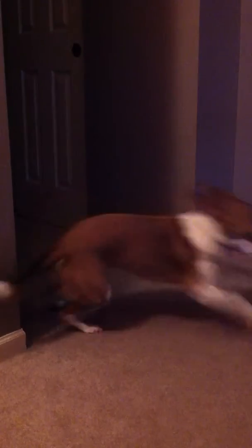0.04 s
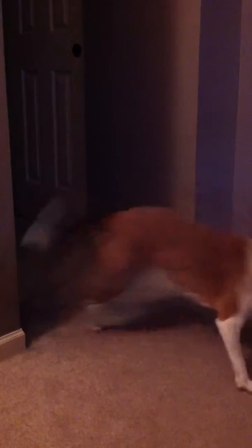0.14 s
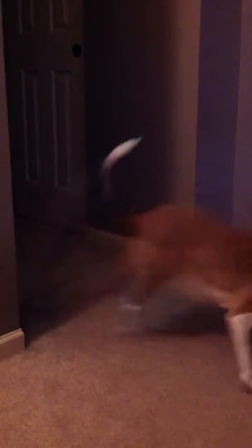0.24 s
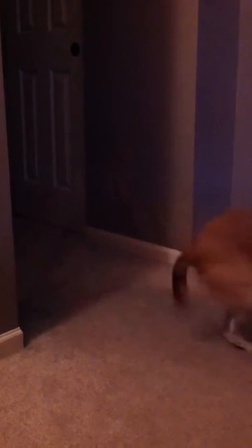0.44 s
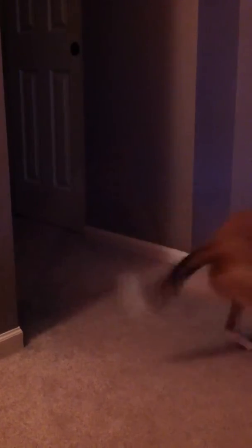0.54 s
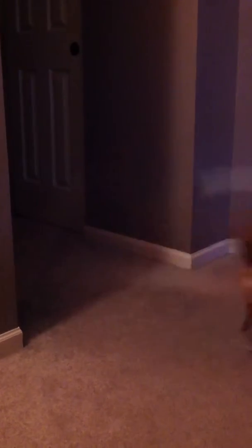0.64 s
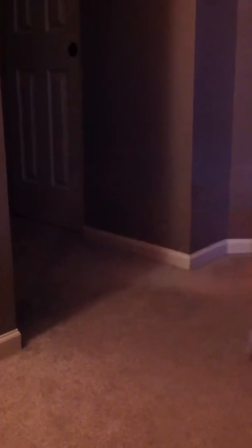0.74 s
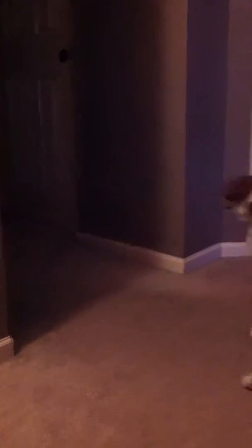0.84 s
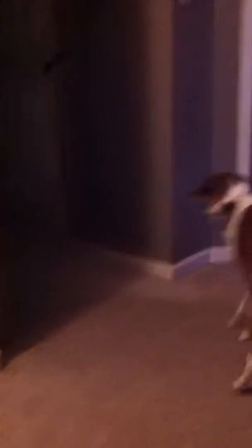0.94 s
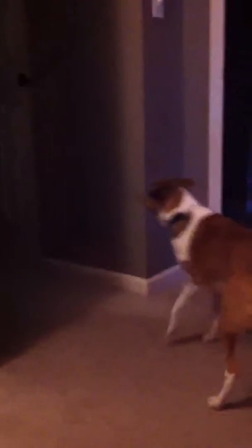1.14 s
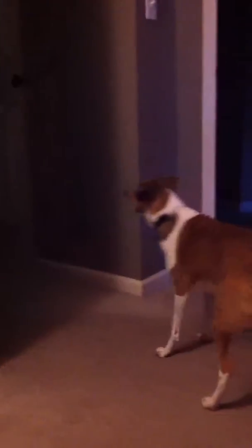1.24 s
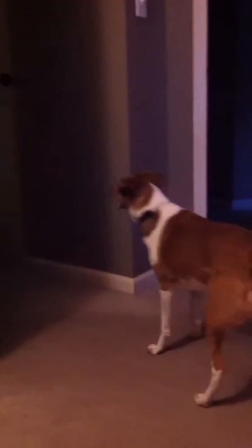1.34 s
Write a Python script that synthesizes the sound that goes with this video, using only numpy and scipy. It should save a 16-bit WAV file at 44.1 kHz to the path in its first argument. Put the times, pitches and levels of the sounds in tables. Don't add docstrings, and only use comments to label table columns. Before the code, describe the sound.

A dog barks twice, sharp and loud, in a hallway while collar tags jingle and paws thud.

```python
import sys
import numpy as np
from scipy import signal
from scipy.fft import rfft, irfft, next_fast_len
from scipy.io import wavfile
from scipy.ndimage import uniform_filter1d, minimum_filter1d, map_coordinates

SR = 44100
rng = np.random.default_rng(int(sys.argv[2]) if len(sys.argv) > 2 else 0)


def bounce(signal):
    frames = np.transpose(np.atleast_2d(signal))
    limited = np.clip(frames, -1, 1)
    pcm = np.round(limited * 32767).astype(np.int16)
    wavfile.write(sys.argv[1], SR, pcm)


def convert_level_to_amplitude(level_db):
    exponent = np.asarray(level_db, float) / 20
    return 10 ** exponent


N = 61739


def unit(x):
    return x / np.sqrt(np.mean(x ** 2) + 1e-20)


def along(points, hz):
    f, v = np.transpose(points)
    return np.interp(np.log(hz + 1), np.log(f + 1), v)


def wobble(rate):
    return map_coordinates(rng.standard_normal(4000), [np.arange(N) * rate / SR], mode="wrap")


def filtered(x, response):
    m = next_fast_len(N + SR // 2)
    return irfft(rfft(x, m) * response(np.fft.rfftfreq(m, 1 / SR)), m)[:N]


def coloured_noise(spectrum):
    return unit(filtered(rng.standard_normal(N), lambda f: convert_level_to_amplitude(along(spectrum, f))))


def resonances(f, peaks):
    total = 0
    for k, (centre, width, db) in enumerate(peaks):
        total = total + (-1) ** k * convert_level_to_amplitude(db) * 1j * f * width / (centre * centre - f * f + 1j * f * width)
    return total


def ring(modes, t, attack_s):
    luck = rng.standard_normal((len(modes), 2))
    total = 0
    for (hz, db, t60), (louder, phase) in zip(modes, luck):
        total = total + convert_level_to_amplitude(db + 2.6 * louder - 60 * t / t60) * np.sin(2 * np.pi * hz * t + phase)
    return total * (1 - np.exp(-t / attack_s))


# f/Hz, level/dB per Hz
AIR_SPECTRUM = [(25, -30), (90, -11), (140, 4), (300, -9), (900, 2), (2000, -4), (8000, -19), (13000, -27)]


def still_air():
    level_db = -68 + 3.0 * wobble(2.4)
    return convert_level_to_amplitude(level_db) * coloured_noise(AIR_SPECTRUM)


# f/Hz, t60/s
HALL_DECAY = [(150, 0.6), (400, 0.12), (600, 0.34), (1200, 0.4), (2000, 0.31), (3500, .36), (8000, 0.33),
              (12000, 0.69)]
STANDING_HZ = [535, 587, 637, 830, 897, 1192, 1224, 1265, 1295, 1362, 1723, 1872, 1947, 2536, 3117]
STANDING_DB = [7.5, 6, 5, 4, 9.5, 2, 3, -5, 2, 5.5, 6, 7.5, 3, -0.5, 7.5]
STANDING_T60_S = [.28, .27, .36, .25, .3, .44, .56, .44, .33, .35, .36, .31, .33, .37, .38]


def hall(x):
    gap_s, build_s, early_s, early_db = .005, .022, .025, -13
    hz, t, z = signal.stft(rng.standard_normal(SR), SR, nperseg=256)
    decay = convert_level_to_amplitude(-60 * t / along(HALL_DECAY, hz)[:, None])
    tail = signal.istft(z * decay, SR, nperseg=256)[1]
    u = np.arange(len(tail)) / SR
    tail = tail * (1 - np.exp(-u / build_s))
    tail = tail / np.linalg.norm(tail)
    when, size = rng.random((2, 7))
    tail[(when * early_s * SR).astype(int)] += convert_level_to_amplitude(early_db) * (2 * size - 1)
    for hz, db, t60 in zip(STANDING_HZ, STANDING_DB, STANDING_T60_S):
        per_sample = 2 * np.log(1000) / (t60 * SR)
        tail += convert_level_to_amplitude(db - 60 * u / t60) * per_sample * np.sin(2 * np.pi * hz * u)
    return signal.fftconvolve(np.pad(x, (round(gap_s * SR), 0)), tail)[:N]


# t/s, thud level/dB, deep push level/dB, scuff level/dB, scuff length/s
PAWS = [(-.01, -46, -87, -65, 0.19), (0.203, -46, -49, -100, .05), (0.24, -44, -45, -86, .05),
        (0.337, -48.5, -59, -84, .05), (0.425, -61.5, -70, -78, 0.039), (.52, -73.5, -66, -72, 0.058),
        (0.627, -70.5, -78, -74.5, 0.053), (0.702, -48, -72, -71.5, .05), (0.731, -63, -55, -60, 0.048),
        (0.785, -50.5, -65, -71, 0.028), (0.855, -50.5, -71, -73.5, 0.059), (0.929, -69.5, -73, -61, 0.085),
        (1.094, -73.5, -70, -65.5, 0.065), (1.267, -82, -69.5, -64, 0.1), (1.323, -73, -73.5, -95, 0.04)]
# f/Hz, width/Hz, level/dB
BOARDS = [(151, 17, -1), (230, 36, -4.5), (300, 66, -2), (345, 29, 1), (478, 64, -13), (560, 42, 2),
          (655, 200, -5), (880, 30, -17.5), (1150, 29, -21.5)]
# f/Hz, level/dB per Hz
CARPET = [(150, -28), (700, 5.5), (1600, 7), (4000, -12), (10000, -11.5), (14000, -34)]
# f/Hz, level/dB, t60/s
LANDING = [(138, 9.5, 0.26), (323.4, -1, .35), (500, -4, 0.44), (537, -0.5, .28), (670, -7.5, .5),
           (745, -20.5, 0.32), (910, -25.5, .8), (1147, -17, 1), (1620, -22.5, 1.4)]


def paws():
    thud_t60_s, push_s, push_hz = 0.31, .007, 45
    t = np.arange(N) / SR
    thud, push, brush = np.zeros((3, N))
    for s, thud_db, push_db, scuff_db, length in PAWS:
        u = np.maximum(t - s, 0)
        thud += convert_level_to_amplitude(thud_db - 60 * u / thud_t60_s) * (1 - np.exp(-u / 0.0021))
        push += convert_level_to_amplitude(push_db) * u / push_s * np.exp(1 - u / push_s) * np.cos(2 * np.pi * push_hz * u)
        brush += convert_level_to_amplitude(scuff_db) * u / length * 4 * np.exp(1 - u / length * 4)
    fibres = coloured_noise(CARPET) * convert_level_to_amplitude(1.4 * wobble(40))
    boards = filtered(thud * rng.standard_normal(N), lambda f: resonances(f, BOARDS))
    leap = convert_level_to_amplitude(-46) * ring(LANDING, t, 0.0017)
    return convert_level_to_amplitude(24) * boards + push + brush * fibres + leap


# t/s, peak level/dB, which tag (0 first, 1 second)
JINGLES = [(.001, -68, 0.7), (0.039, -58, 0), (0.13, -68, 1), (0.141, -56, 1), (0.194, -64, 0.03),
           (.262, -46.5, 0.8), (0.373, -63, 0.91), (0.397, -50, 0.3), (0.542, -58.5, 0.94),
           (.646, -58.5, 1), (0.66, -47.5, 0.03), (0.799, -38, 0.06), (0.871, -50, 0.84),
           (0.975, -57, 0.58), (1.021, -59, .4), (1.105, -68, 0.69), (1.175, -68, 0.5),
           (1.286, -57.5, 0.41)]
# f/Hz, level/dB, t60/s
FIRST_TAG = [(3340, -18, .1), (5680, -12, .08), (6928, -12, .12), (8810, 0, .08), (8930, -4, .1),
             (12600, -13, .15)]
# f/Hz, level/dB, t60/s
SECOND_TAG = [(5663, -14, .1), (9302, -2, .12), (10880, -7, .12), (10990, -7, .15), (12620, -9, .16),
              (13730, -12, .08)]
# f/Hz, level/dB per Hz
SIZZLE = [(2500, -33.5), (5500, -0.5), (9000, 1), (11000, -4), (12600, -10), (14000, -15.5), (16000, -45)]


def tags():
    tick_db, tick_t60_s, rattle_db = -8, 0.072, 1.5
    t = np.arange(SR // 4) / SR
    ringing, scrape = np.zeros((2, N + SR))
    for s, db, which in JINGLES:
        which = np.clip(which, 0, 1)
        start = round(s * SR)
        first, second = ring(FIRST_TAG, t, 0.003), ring(SECOND_TAG, t, 0.00071)
        ringing[start:][:len(t)] += convert_level_to_amplitude(db) * ((1 - which) * first + which * second)
        scrape[start:][:len(t)] += convert_level_to_amplitude(db + tick_db - 60 * t / tick_t60_s) * (1 - np.exp(-t / 0.0017))
    return (ringing[:N] + scrape[:N] * coloured_noise(SIZZLE)) * convert_level_to_amplitude(rattle_db * wobble(150))


# t/s, depth/dB, half length/s
CATCHES = [
    (.263, 3, .003),
    (.2775, 7, .003),
    (.291, 12, .0025),
    (.317, 3, .004),
    (.372, 5, .005),
    (.775, 7, .002),
    (.802, 6, .005),
    (.837, 5, .005),
    (.862, 4, .004),
    (.897, 4, .005),
]


def catches():
    t = np.arange(N) / SR
    return convert_level_to_amplitude(-sum(depth * np.exp(-((t - at) / half) ** 2) for at, depth, half in CATCHES))


def tract(f, peaks):
    low_cut_hz, top_hz = 330, 10500
    low = 1j * f / low_cut_hz
    return resonances(f, peaks) * (low / (1 + low)) ** 2 / (1 + (f / top_hz) ** 10)


# t/s, pitch f/Hz, effort level/dB, roughness 0-1, fundamental level/dB, mouth opening 0-1
BARKS = [
    [(.205, 400.2, -54, 0.28, -8.5, 0.1), (.226, 411.5, -21, 0.22, -5, 0.43),
     (.236, 454, -21.5, 0.3, 14.5, 0.95), (.254, 540.6, -13.5, 0.02, -4.5, 0.32),
     (.27, 617.7, -10, 0.17, -3.5, 1), (.306, 651.2, -13, 0.02, -7.5, 0.49),
     (.328, 625.5, -18, 0.02, -3, 0.23), (.343, 520.4, -24.5, 0.15, 7.5, 0.3),
     (.39, 300, -41, 0.42, 8, .05)],
    [(.7, 300, -70, 0.5, -9.5, 0.79), (.731, 345, -25.5, 0.35, -13, 0.64),
     (.753, 453.5, -15, 0.2, -30.5, 1), (.759, 486.6, -14.5, 0.27, 7.5, 0.5),
     (.771, 499.8, -12.5, 0.48, 10, 0.7), (.777, 603.3, -8.5, 0.13, -2, 0),
     (.827, 586.3, -18.5, 0.22, -0.5, 0), (.84, 531.7, -20, .3, -2, 0.3), (.88, 432, -49, 0.05, 20.5, .05)],
]
# f/Hz, width/Hz, level/dB
JAWS_WIDE = [
    [(554, 230, -6), (1260, 215, 4), (1885, 337, -2), (2380, 750, -10.5), (3104, 440, -11.5),
     (4330, 970, -47), (7310, 1700, -35.5)],
    [(749, 159, 7.5), (1480, 248, 4.5), (1855, 230, -2), (2260, 270, 0.5), (2715, 420, -5),
     (5650, 490, -64), (7300, 738, -23.5)],
]
# f/Hz, width/Hz, level/dB
JAWS_SHUT = [
    [(540, 500, -4), (950, 350, -5.5), (1770, 400, -29.5), (3000, 500, -30.5)],
    [(570, 120, -2.5), (1321, 328, 0), (1803, 1100, -19.5), (2500, 460, -29.5), (2920, 820, -25.5),
     (5670, 800, -42)],
]
# f/Hz, level/dB per Hz
RUSH = [(2500, -14.5), (3600, 5.5), (5200, 3), (7200, 2.5), (9500, -6), (11000, -21), (12500, -30)]


def rush_response(f):
    pipe_hz, pipe_db = 1452, 1.5
    return convert_level_to_amplitude(along(RUSH, f) + pipe_db * np.cos(2 * np.pi * f / pipe_hz))


def bark(rows, wide, shut):
    jitter, shimmer_db, flutter_db, hiss_db = 0.032, 2.06, 1.2, 5
    tone_top_hz, spread = 3420, 0.74
    rush_db, rush_grain_db, rush_grows = -41, 3, 0.94
    s, *cols = np.transpose(rows)
    t = np.arange(N) / SR
    hz, db, rough, first_db, mouth = [np.interp(t, s, c) for c in cols]
    rough, mouth = np.clip(rough, 0, 1), np.clip(mouth, 0, 1)

    phase = 2 * np.pi * np.cumsum(hz * (1 + jitter * rough * wobble(300))) / SR
    upper = 0
    for k in range(2, 11):
        upper = upper + np.cos(k * phase + spread * k * k) / (1 + (k * hz / tone_top_hz) ** 10)
    unevenness = convert_level_to_amplitude(shimmer_db * wobble(250) + flutter_db * wobble(110))
    pulses = (convert_level_to_amplitude(first_db) * np.cos(phase) + upper) / 3 * unevenness
    breath = unit(rng.standard_normal(N) * (1 + np.cos(phase))) * convert_level_to_amplitude(hiss_db)
    sounding = (t > s[0]) * (t < s[-1])
    source = (np.sqrt(1 - rough) * pulses + np.sqrt(rough) * breath) * convert_level_to_amplitude(db + 11) * sounding

    swell = np.sin(np.pi * np.clip((t - s[0]) / (s[-1] - s[0]), 0, 1))
    rush_level = convert_level_to_amplitude(rush_db + rush_grain_db * wobble(150) + rush_grows * (db - db.max()))
    rush = unit(filtered(breath, rush_response)) * rush_level * swell
    open_voice = filtered(source * mouth, lambda f: tract(f, wide))
    shut_voice = filtered(source * (1 - mouth), lambda f: tract(f, shut))
    return rush + open_voice + shut_voice


def scene():
    voice_wet_db, tag_wet_db = -4, -8
    collar = tags()
    voices = [bark(*one) for one in zip(BARKS, JAWS_WIDE, JAWS_SHUT)]
    echoes = sum(hall(v) for v in voices) * convert_level_to_amplitude(voice_wet_db)
    dog = (sum(voices) + echoes) * catches()
    return (still_air() + paws() + collar + hall(collar) * convert_level_to_amplitude(tag_wet_db) + dog)[None]


def top_cut(x):
    return signal.sosfilt(signal.butter(12, 15700, fs=SR, output="sos"), x)


def record(dry):
    mic_low_hz, mic_top_hz, ceiling, hold_s = 119, 12980, .68, .012
    heard = filtered(dry[0], lambda f: 1j * f / (mic_low_hz + 1j * f) / (1 + (f / mic_top_hz) ** 10))
    span = round(hold_s * SR)
    needed = np.minimum(1, ceiling / (np.abs(heard) + 1e-9))
    gain = uniform_filter1d(minimum_filter1d(needed, size=span), size=span)
    return top_cut((heard * gain)[None])


dry = scene()
out = record(dry)
bounce(out)
```